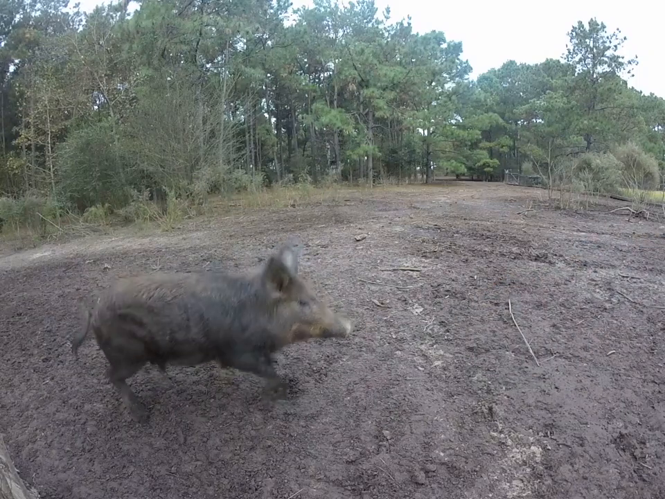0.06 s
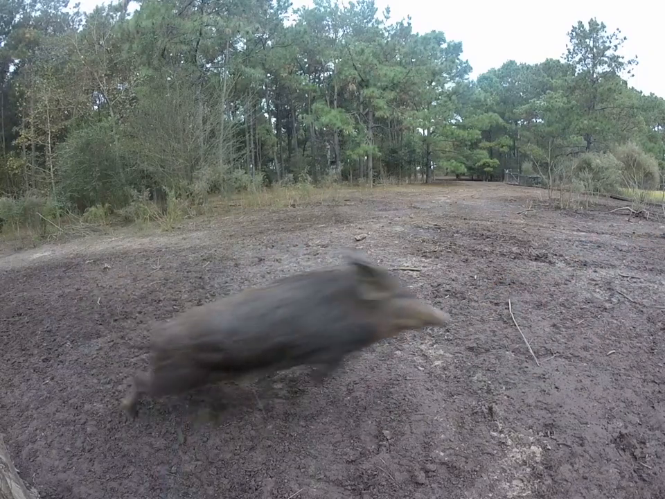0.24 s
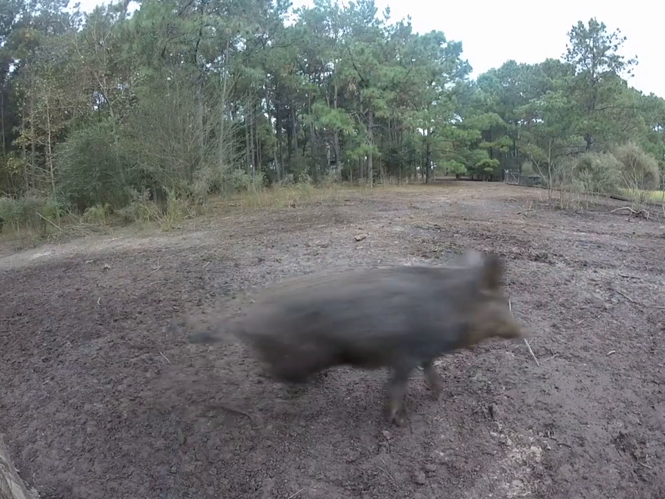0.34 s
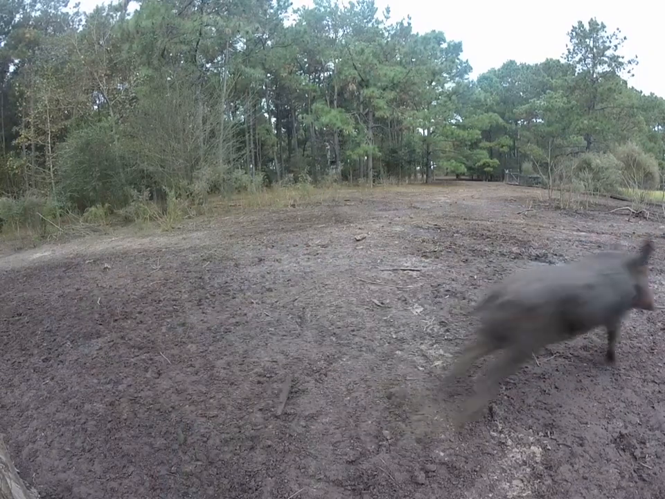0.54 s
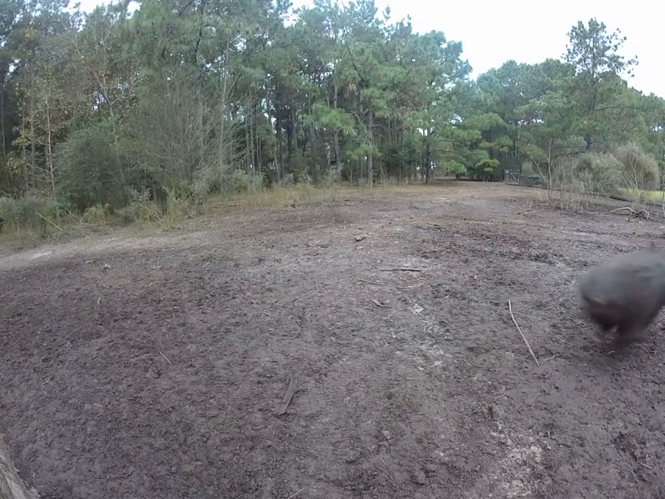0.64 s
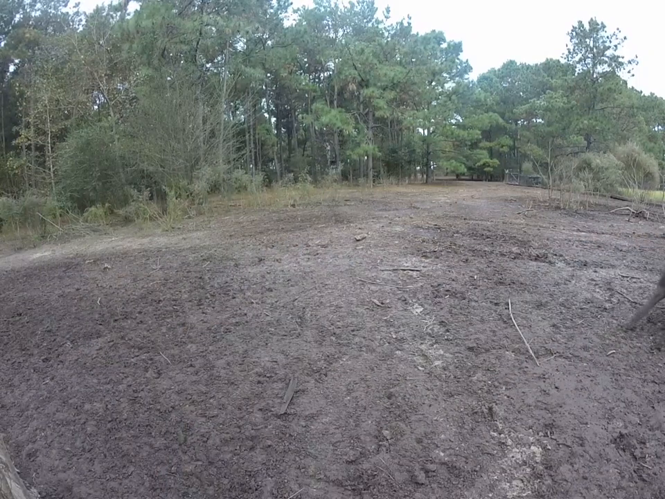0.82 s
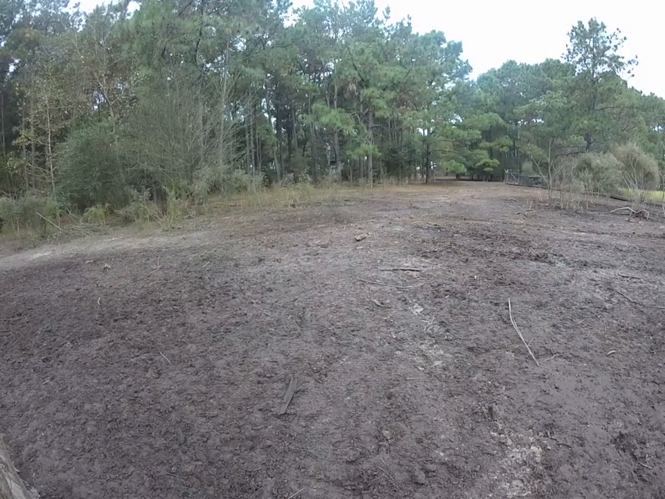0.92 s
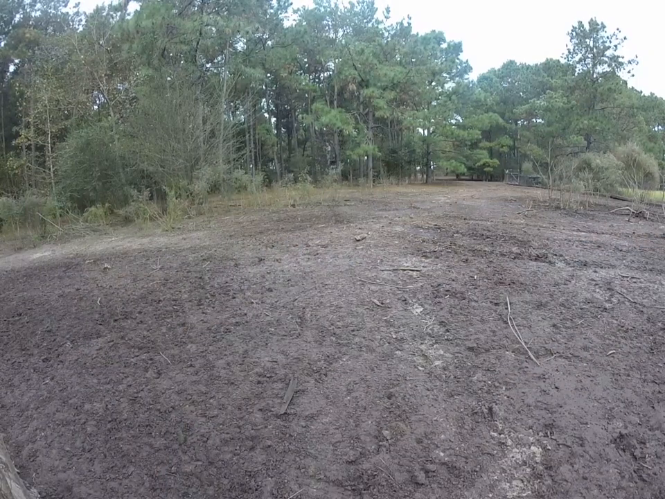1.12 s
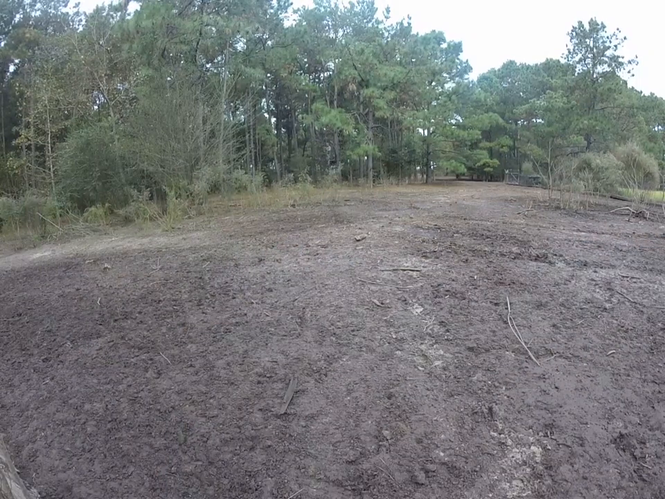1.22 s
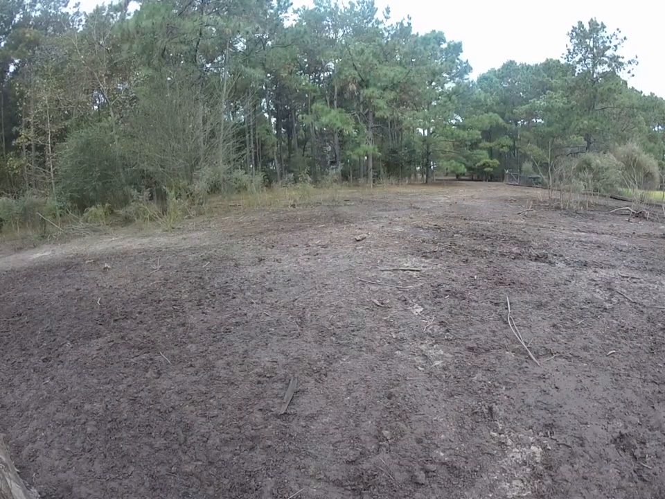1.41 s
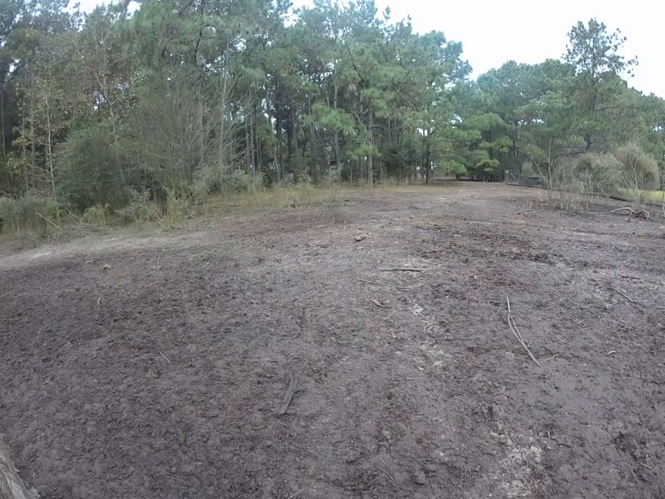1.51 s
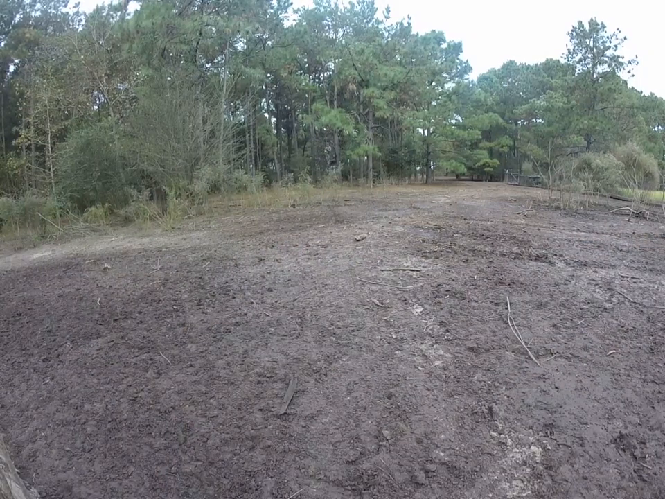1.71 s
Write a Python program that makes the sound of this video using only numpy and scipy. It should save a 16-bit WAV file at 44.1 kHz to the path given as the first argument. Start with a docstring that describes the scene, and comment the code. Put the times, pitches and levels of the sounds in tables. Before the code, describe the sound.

A rifle fires, heard from near the bullet's impact in a wooded clearing as two sharp cracks close together. A hollow, ringing echo rolls away, with two weaker thuds and then a faint, distant cry.

```python
"""A rifle shot at a wild boar in a forest clearing, heard by a small cased camera near the animal.
Over a quiet hiss the bullet's crack comes first, then its slap and a spray of dirt. Next the muzzle blast
arrives, overloads the microphone, rings the case and rolls away through the trees. Two duller thuds and
then a faint far cry follow as the boar bolts, while an insect chirps and a low drone grows."""
import sys
import numpy as np
from scipy import signal
from scipy.fft import rfft, irfft
from scipy.io import wavfile
from scipy.ndimage import uniform_filter1d

SR = 44100
rng = np.random.default_rng(int(sys.argv[2]) if len(sys.argv) > 2 else 0)


def inscribe(sig):
    """Save sig as 16-bit PCM at rate SR to the path in sys.argv[1].

    A 1-D sig is mono; a 2-D sig holds one channel per row.
    Samples are clipped to [-1, 1] before scaling.
    """
    pcm = np.round(np.clip(np.atleast_2d(sig).T, -1, 1) * 32767)
    wavfile.write(sys.argv[1], SR, pcm.astype(np.int16))


N = 77175
T = np.arange(N) / SR
HZ = np.fft.rfftfreq(N, 1 / SR)
BLAST_S = 0.3185  # when the muzzle blast arrives

# A colour says how strong the low and high parts of a sound are, compared with each other.
# colours of the background hiss, low rumble and ticking twigs: f/Hz, level/dB
AIR_COLOUR = [(88, -35), (150, -6), (566, -9.5), (1040, -14), (2270, -18.5), (4950, -19), (7400, -26.5),
              (8300, -25.5), (9400, -29.5), (14800, -37), (16000, -58)]
RUMBLE_COLOUR = [(20, -11.5), (53, -6.5), (63, -7.5), (78, 5), (92, -10), (106, 2), (150, -18), (250, -18),
                 (600, -59.5)]
TICK_COLOUR = [(300, -5), (1500, -2), (3000, 7), (5000, -4), (6500, -3.5), (8700, -7), (14000, -30)]
# how the hiss, its extra treble gain, the rumble and the drone rise and fall: t/s, level/dB
AIR_LEVEL = [(0, -60), (.22, -57.5), (.32, -53.5), (.4, -84), (.75, -69.5), (1.1, -67.5), (1.45, -61.5),
             (1.75, -59.5)]
AIR_TREBLE_GAIN = [(0, -8), (.25, 10), (.4, -11.5), (.7, -6), (1.1, -1.5), (1.75, -5)]
RUMBLE_LEVEL = [(0, -65), (.17, -61.5), (.2, -52), (.6, -49), (.9, -51.5), (1.2, -51.5), (1.5, -49),
                (1.75, -52.5)]
DRONE_LEVEL = [(0, -66), (1, -57.5), (1.3, -48), (1.75, -50.5)]
# the drone's two low notes: f/Hz, width/Hz, relative level/dB
DRONE_BANDS = [(51.7, 4.4, 5.5), (106, 9.3, -8)]
# the insect's high rasp: f/Hz, width/Hz, level against the hiss/dB
CHIRP_BANDS = [(8340, 810, -7.5), (11400, 900, -20)]
# the middle of each chirp: t/s
CHIRP_TIMES = [.81, 1.06, 1.396, 1.709]
# bits of dirt and twigs: t/s, level/dB, decay/s
TICKS = [(0.037, -50.5, 0.0082), (0.166, -52.5, 0.0035)]
# the parts of the far cry: t/s, f/Hz, width/Hz, level/dB, rise/s, decay/s
CRY_BANDS = [(1.413, 4360, 200, -52.5, 0.014, 0.048), (1.415, 2760, 550, -46, 0.044, 0.094),
             (1.43, 2980, 190, -46, 0.027, 0.066), (1.422, 1713, 135, -40, 0.031, 0.18)]

# how long the forest echoes: f/Hz, time to fade by 60 dB/s
FOREST_FADE = [(300, 5.5), (800, 0.56), (1600, 1.14), (2500, 0.6), (4500, 0.94), (8000, 0.41)]
# hollow notes in the rolling echo: f/Hz, width/Hz, relative level/dB, drift/(Hz per s)
ROLL_NOTES = [(505.1, 21, -0.5, 14), (588.4, 24.2, 1.5, -12), (660.5, 25, -12, 0.5), (723.5, 19, -15, -0.5),
              (776.3, 30.7, -11.5, -4.5)]
# colour of the broad wash under those notes: f/Hz, level/dB
WASH_COLOUR = [(180, -35), (340, -17), (405, -15.5), (480, 6.5), (600, 7), (880, -6.5), (1200, -1),
               (1400, -13.5), (1650, -7), (2000, -22.5), (3000, -20), (4000, -64.5), (9000, -80)]
# how the notes and the wash rise and fall: t/s, level/dB
ROLL_LEVEL = [(0.33, -32), (0.412, -22.5), (0.452, -27), (0.504, -18.5), (0.528, -19), (0.551, -31),
              (0.563, -27), (0.622, -29), (0.646, -23.5), (0.704, -30.5), (0.764, -26), (0.902, -31.5),
              (1.014, -26), (1.04, -41), (1.068, -25), (1.084, -34), (1.204, -29), (1.258, -38.5),
              (1.298, -28.5), (1.43, -38.5), (1.496, -29.5), (1.528, -37.5), (1.61, -33), (1.73, -41.5),
              (1.75, -40)]
WASH_LEVEL = [(0.35, -36), (0.5, -31), (0.8, -38), (1.75, -41)]
# notes at which the camera case rings: f/Hz, gain/dB
CASE_NOTES = [(1030, -2), (1160, -3), (1232, -0.5), (1758, -5.5), (2321, -5), (2465, -1), (2656, -7.5),
              (2718, -2.5), (2968, -1.5), (3181, 2.5), (4445, -4.5), (4877, 0.5)]
# its thin, high zing: f/Hz, width/Hz, level/dB, decay/s
CASE_ZING = [(6600, 200, -58, 0.06), (10800, 450, -66, 0.036)]

# thuds, the loudest a quick double blow: t/s, level/dB, rise/s, hold/s, treble tilt/(dB per octave)
THUDS = [(0.832, -28.5, 0.017, 0.013, -1.5), (1.0155, -22.5, 0.00093, 0.004, -2.5),
         (1.025, -24.5, 0.0017, 0.003, -4), (1.67, -40, 0.089, 0.065, -7)]
# crisp edges of the two louder thuds: t/s, level/dB
THUD_EDGES = [(.8425, -38.5), (1.016, -42)]
# colours of the thuds and their edges: f/Hz, level/dB
THUD_COLOUR = [(270, -52), (345, -20), (410, -30.5), (600, -22), (950, -9), (1030, -0.5), (1170, 3.5),
               (1400, -11), (1600, 1), (1950, -19.5), (2250, -0.5), (2550, -4), (3100, -10.5),
               (3500, -21.5), (4000, -26), (4400, -26), (5200, -31), (6000, -51.5), (12000, -73)]
EDGE_COLOUR = [(600, -10.5), (2600, 7.5), (3300, -5.5), (3800, -6.5), (5400, -2), (6100, -33.5),
               (12000, -42.5)]
# shock waves from the bullet's nose and tail: t/s, relative level/dB
SHOCKS = [(0.243, 4), (0.2432, 6.5)]
# snaps and near echoes around the crack, and grit hitting the case: t/s, level/dB, decay/s
SNAPS = [(0.2407, -27.5, 0.0058), (0.2433, -11.5, 0.003)]
GRIT = [(0.2543, -30.5, 0.01), (0.2988, -35, 0.0024)]
# colours of the crack, the grit and the spray of dirt: f/Hz, level/dB
SNAP_COLOUR = [(100, -34.5), (350, -17.5), (800, -22.5), (1250, -13), (2300, -10.5), (2600, 4.5), (3100, 6),
               (3600, -17), (4400, -1.5), (4950, 1), (5850, -27), (6800, -12.5), (9000, -16),
               (13000, -29.5), (16000, -45)]
GRIT_COLOUR = [(200, -15), (1200, -2.5), (3000, 4.5), (4000, -5.5), (6000, -3.5), (8000, -11.5),
               (11500, -18), (15500, -29)]
SPRAY_COLOUR = [(100, -29), (480, -27), (660, -12), (830, 1.5), (1300, -4), (2000, -4), (2900, -4),
                (4000, -13), (4800, -10.5), (6000, -44), (9000, -44), (15000, -62)]
# colours of the blast, its bounce off nearby ground and trunks, and its forest echo: f/Hz, level/dB
BLAST_COLOUR = [(90, -25.5), (200, -21.5), (420, -22.5), (720, -2.5), (1000, -4.5), (1330, -20), (1900, -1),
                (2100, -8), (2400, 7.5), (3100, -4), (3700, -11), (4900, -5), (5700, -32), (9000, -35.5),
                (15000, -64)]
NEAR_COLOUR = [(100, -28.5), (400, -26), (700, -15), (1000, 1.5), (1350, -14), (1900, -6.5), (2100, -7),
               (2400, 6), (3150, 4), (3500, -14.5), (4000, -15.5), (4800, -11), (6000, -25.5), (8000, -43),
               (15000, -60.5)]
FOREST_COLOUR = [(200, -38), (350, -37), (500, -10.5), (800, -2.5), (1050, 0), (1400, -9.5), (1750, -2),
                 (2050, -9.5), (2350, -1), (2750, 4.5), (3200, -5.5), (3450, -13), (4000, -25),
                 (4350, -14.5), (5100, -20), (5700, -27.5), (6050, -42), (8300, -44), (14000, -71.5)]


def amp(db):
    """Turns decibels into a gain to multiply by."""
    return 10 ** (np.asarray(db) / 20)


def unit(x):
    """Scales a sound to an average strength (rms) of 1."""
    return x / np.sqrt(np.mean(x ** 2) + 1e-20)


def read(points, hz):
    """Reads between a table's rows, with octaves evenly spaced."""
    f, value = np.transpose(points)
    return np.interp(np.log(hz + 1), np.log(f), value)


def level(points):
    """Gain over time from rows of t/s, level/dB."""
    return amp(np.interp(T, *np.transpose(points)))


def noise(gain):
    """Noise of strength 1, shaped by a gain at each frequency."""
    return unit(irfft(gain * np.exp(2j * np.pi * rng.random(len(HZ))), N))


def steadied(x, span_s):
    """Evens out the swells of a noise that are slower than the span."""
    size = max(int(span_s * SR / np.sqrt(2)), 2)
    power = uniform_filter1d(uniform_filter1d(x ** 2, size), size)
    return unit(x / np.sqrt(power + 1e-9))


def hiss(colour):
    """Dense, even noise of a given colour."""
    return steadied(noise(amp(read(colour, HZ))), 0.0055)


def peak(hz, width):
    """Gain that favours a narrow band around one pitch."""
    return 1 / (1 + ((HZ - hz) / (0.78 * width)) ** 2)


def ringing(hz, width):
    """A wavering tone of nearly even strength."""
    return steadied(noise(peak(hz, width)), 0.014)


def drifting(hz, width, drift):
    """A narrow band of noise whose pitch slides slowly."""
    slide = np.exp(1j * np.pi * drift * (T - BLAST_S) ** 2)
    return (signal.hilbert(noise(peak(hz, width))) * slide).real


def click(colour, size=2048):
    """A click of a given colour, with its energy of 1 packed at the start."""
    log_gain = np.log(amp(read(colour, abs(np.fft.fftfreq(size, 1 / SR)))))
    pulse = np.fft.ifft(np.exp(np.conj(signal.hilbert(log_gain)))).real
    return pulse / np.linalg.norm(pulse)


def burst(start, rise, hold, decay):
    """A loudness shape that rises, holds and dies away (times in seconds)."""
    t = T - start
    return np.clip(t / rise, 0, 1) * np.exp(-np.maximum(t - rise - hold, 0) / decay)


def air(split_hz=8400):
    """Background hiss sinks and dulls after the shot, then creeps back."""
    wide = noise(amp(read(AIR_COLOUR, HZ)))
    treble = irfft(rfft(wide) / (1 + (split_hz / (HZ + 1)) ** 10), N)
    return (wide + treble * (level(AIR_TREBLE_GAIN) - 1)) * level(AIR_LEVEL)


def rumble_and_drone():
    """A low rumble runs throughout, and a drone grows late."""
    rumble = steadied(noise(amp(read(RUMBLE_COLOUR, HZ))), 0.33)
    drone_gain = sum(amp(db) * peak(hz, width) for hz, width, db in DRONE_BANDS)
    drone = steadied(noise(drone_gain), 0.09)
    return rumble * level(RUMBLE_LEVEL) + drone * level(DRONE_LEVEL)


def insect(half_length_s=0.019):
    """Short, high chirps that follow the level of the hiss."""
    rasp = sum(amp(db) * noise(peak(hz, width)) for hz, width, db in CHIRP_BANDS)
    swells = sum(np.exp(-((T - s) / half_length_s) ** 2) for s in CHIRP_TIMES)
    return rasp * swells * level(AIR_LEVEL)


def twigs():
    """Bits of dirt and twigs tick on the ground."""
    return hiss(TICK_COLOUR) * sum(amp(db) * burst(s, 0.00073, 0, decay) for s, db, decay in TICKS)


def far_cry():
    """Perhaps the boar: a few ringing bands swell, highest first, and fade among the trees."""
    return sum(amp(db) * noise(peak(hz, width)) * burst(s, rise, 0.0075, decay)
               for s, hz, width, db, rise, decay in CRY_BANDS)


def forest_echo(gain, start, rise, length_scale=1):
    """Sound bounces off many trees, and each band of pitch dies at its own speed."""
    spectrum = rfft(noise(gain))
    t = np.maximum(T - start, 0)
    centres_hz = np.geomspace(200, 12000, 12)
    tail = np.zeros(N)
    for hz, weights in zip(centres_hz, np.eye(len(centres_hz))):
        band = irfft(spectrum * np.interp(np.log(HZ + 1), np.log(centres_hz), weights), N)
        fade_s = length_scale * read(FOREST_FADE, hz)
        tail += band * np.exp(-np.log(1000) * t / fade_s)
    return np.minimum(t / rise, 1) * tail


def roll():
    """Far echoes keep a few hollow, drifting notes ringing over a broad wash of noise."""
    notes = sum(amp(db) * width ** 0.5 * drifting(hz, width, drift)
                for hz, width, db, drift in ROLL_NOTES)
    ring = steadied(notes, 0.03) * level(ROLL_LEVEL)
    wash = noise(amp(read(WASH_COLOUR, HZ))) * level(WASH_LEVEL)
    return (ring + wash) * np.clip((T - BLAST_S) / 0.014, 0, 1)


def with_case_ring(x):
    """A sound plus the ringing that it wakes in the camera case."""
    return x + sum(amp(db) * signal.lfilter(*signal.iirpeak(hz, Q=130, fs=SR), x)
                   for hz, db in CASE_NOTES)


def case_thump():
    """The blast thumps the camera case and leaves a thin zing."""
    zing = sum(amp(db) * ringing(hz, width) * burst(BLAST_S, 0.0017, 0, decay)
               for hz, width, db, decay in CASE_ZING)
    thump = amp(-46) * ringing(hz=100, width=25) * burst(BLAST_S, 0.002, 0, decay=0.038)
    return zing + thump


def thuds():
    """Dull, smeared bangs, each with its own echo; the louder ones have a crisp edge."""
    out = hiss(EDGE_COLOUR) * sum(amp(db) * burst(s, 0.0014, 0, decay=0.009) for s, db in THUD_EDGES)
    octaves = np.log2((HZ + 100) / 1000)
    for s, db, rise, hold, tilt in THUDS:
        gain = amp(read(THUD_COLOUR, HZ) + tilt * octaves)
        direct = steadied(noise(gain), 0.014) * burst(s, rise, hold, decay=0.022)
        echo = amp(-6.5) * forest_echo(gain, s, rise + hold, length_scale=0.81)
        out += amp(db) * (direct + echo)
    return out


def dirt_spray(start_s=0.2697, fade_db_per_s=243.5):
    """The bullet throws up dirt in a short, quickly fading rush."""
    fade = amp(-19.5 - fade_db_per_s * np.maximum(T - start_s, 0))
    return hiss(SPRAY_COLOUR) * fade * burst(start_s, rise=0.01, hold=0.024, decay=0.0038)


def bullet_crack(shock_gain_db=1.5):
    """The bullet's shock waves snap past, and grit rattles on the case."""
    fronts = np.zeros(N)
    for s, db in SHOCKS:
        fronts[int(s * SR)] += amp(shock_gain_db + db)
    crack = signal.oaconvolve(fronts, click(SNAP_COLOUR))[:N]
    for colour, hits in (SNAP_COLOUR, SNAPS), (GRIT_COLOUR, GRIT):
        bursts = sum(amp(db) * burst(s, 0.00016, 0.00048, decay) for s, db, decay in hits)
        crack += steadied(hiss(colour), 0.0017) * bursts
    return crack


def muzzle_blast(rise_s=0.0015, hold_s=0.0012, decay_s=0.0029):
    """The bang from the barrel bounces off nearby ground and trunks, then the whole forest."""
    t = T - BLAST_S
    front = np.exp(np.minimum(t, 0) / rise_s - np.maximum(t - hold_s, 0) / decay_s)
    near = amp(-13.5) * hiss(NEAR_COLOUR) * burst(BLAST_S, rise=0.0016, hold=0.011, decay=0.016)
    forest = amp(-18) * forest_echo(amp(read(FOREST_COLOUR, HZ)), BLAST_S, rise=0.0072)
    direct = amp(-6) * hiss(BLAST_COLOUR) * front
    return direct + near + forest


def scene():
    """All the sounds meet at one microphone."""
    bullet = bullet_crack() + dirt_spray()
    bangs = with_case_ring(muzzle_blast() + thuds()) + case_thump()
    distance = roll() + far_cry()
    background = twigs() + insect() + rumble_and_drone() + air()
    return (bullet + bangs + distance + background)[None]


def record(dry, hardness=24, cutoff_hz=15900):
    """The overloaded microphone squashes the loudest peaks; then the highest treble is cut."""
    squashed = dry / (1 + abs(dry) ** hardness) ** (1 / hardness)
    lowpass = signal.firwin(301, cutoff_hz, window=("kaiser", 9), fs=SR)
    return signal.oaconvolve(squashed, lowpass[None], "same")


dry = scene()
out = record(dry)
inscribe(out)
```